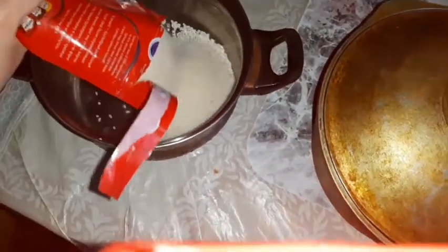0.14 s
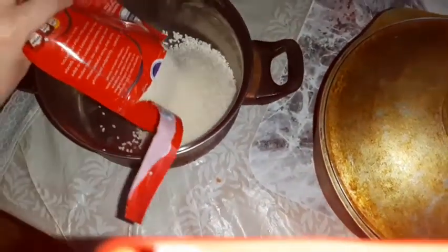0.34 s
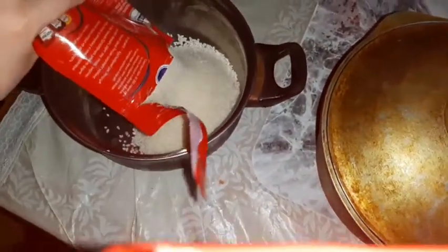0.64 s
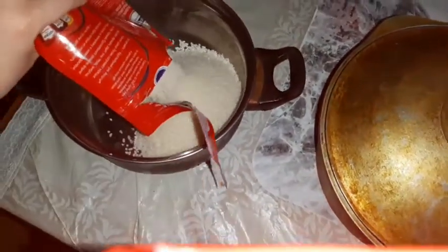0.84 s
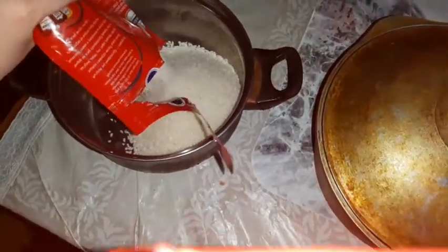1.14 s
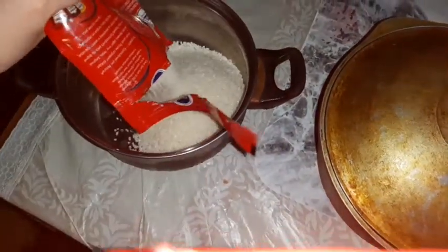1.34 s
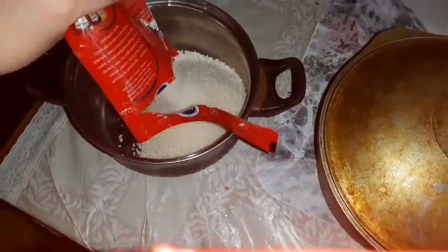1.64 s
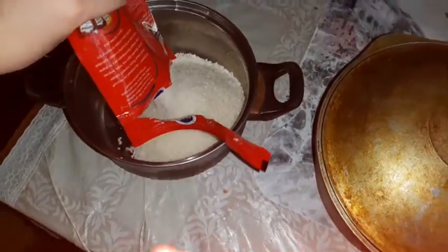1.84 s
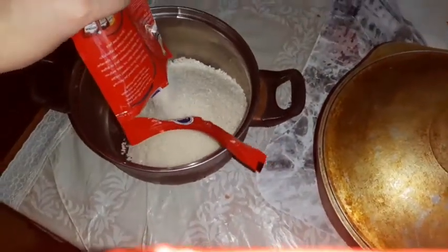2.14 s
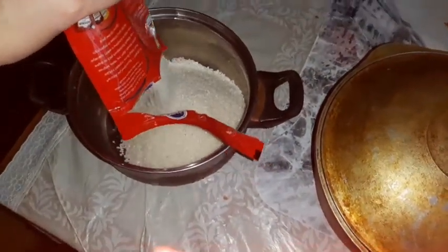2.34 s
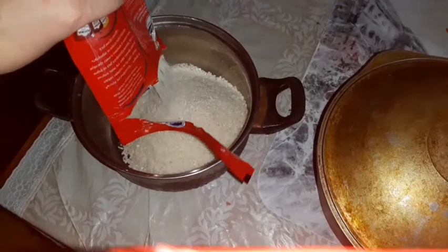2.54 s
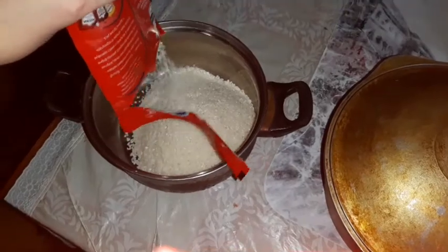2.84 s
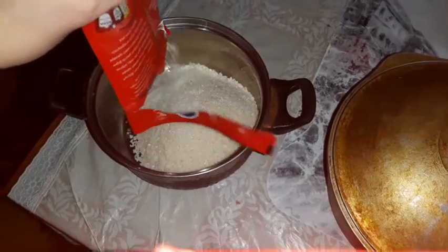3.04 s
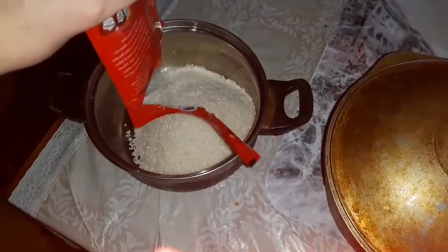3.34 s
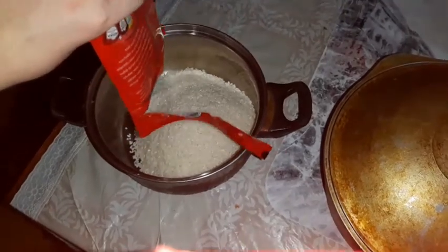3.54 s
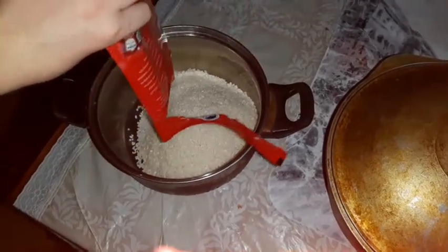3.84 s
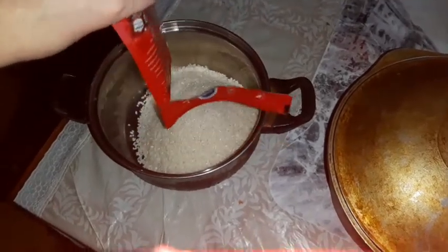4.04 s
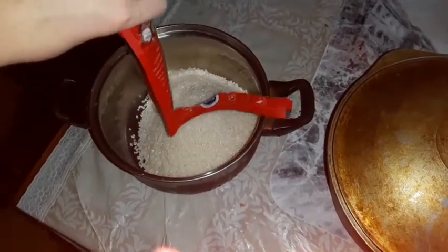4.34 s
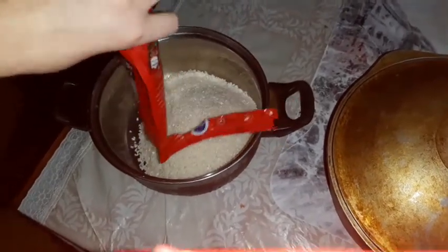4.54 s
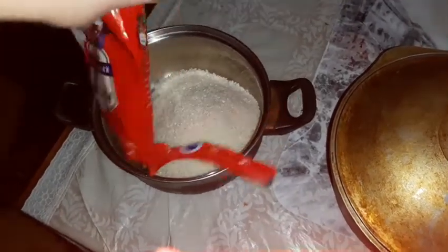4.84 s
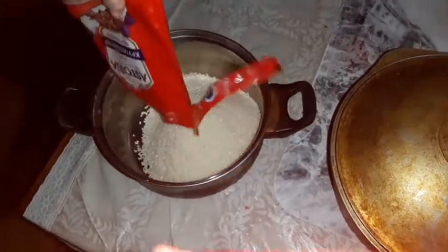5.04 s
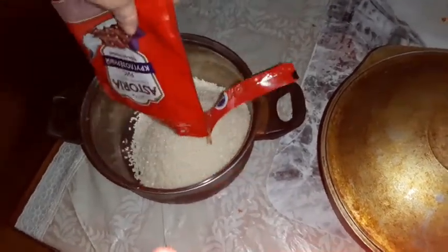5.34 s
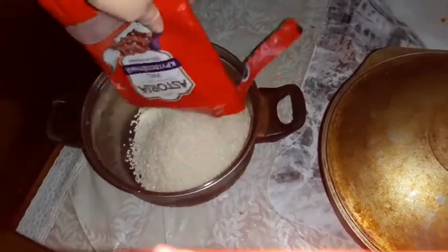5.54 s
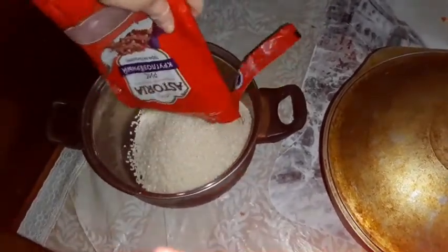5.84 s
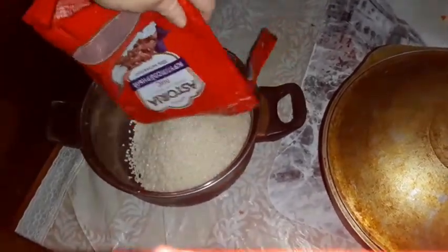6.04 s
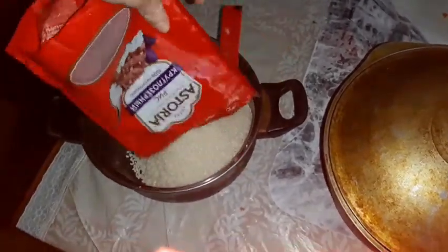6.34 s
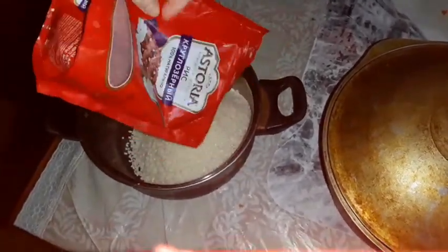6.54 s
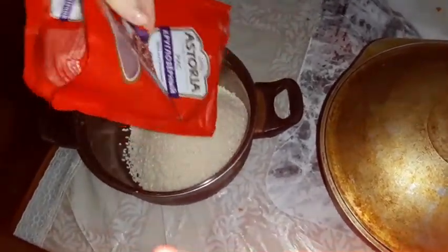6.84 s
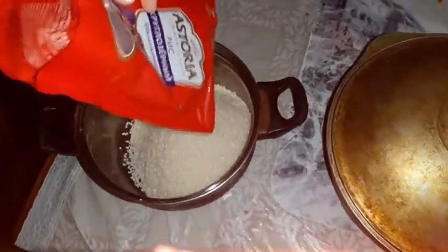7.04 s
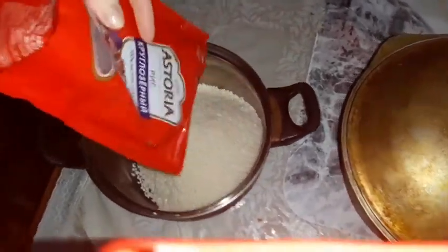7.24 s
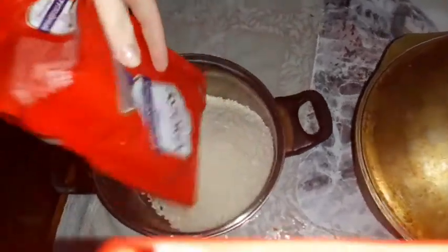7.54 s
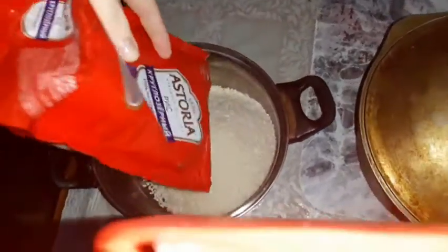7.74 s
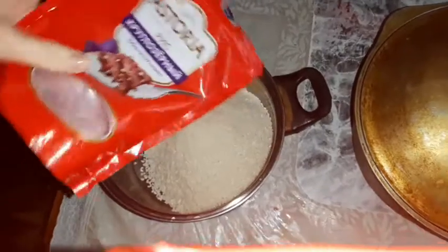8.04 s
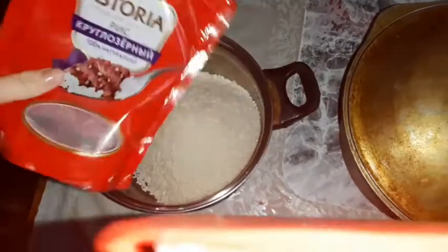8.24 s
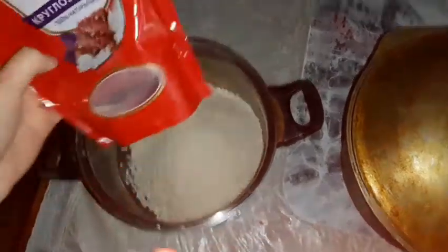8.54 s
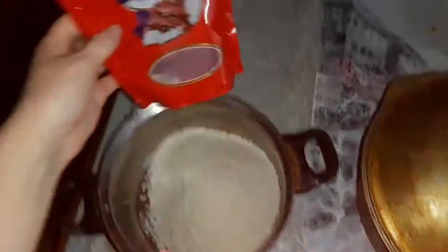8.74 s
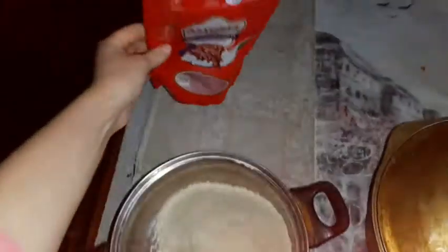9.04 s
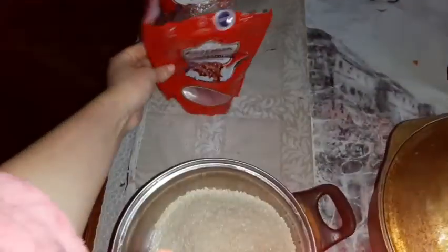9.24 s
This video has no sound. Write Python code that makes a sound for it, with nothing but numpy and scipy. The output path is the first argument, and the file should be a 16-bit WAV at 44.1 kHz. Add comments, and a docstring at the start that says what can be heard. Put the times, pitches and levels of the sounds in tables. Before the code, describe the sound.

A bright rush of dry grains rattles into a metal pot, close to a stereo microphone, with a few glassy plastic ticks. It dwindles to a trickle and ends. Plastic snaps, pops and dull bumps follow in bursts as the packet is emptied. A low refrigerator-like hum, leaning left, stops midway, and the last handling is very quiet in the short room.

```python
"""Dry rice pours from a plastic packet into a steel pot, close by in a small kitchen, over a motor's hum on the left.
Random impacts make the hiss of the heap; resonances make the ringing hollow and wall of the pot.
The packet is then shaken empty, snapping and crackling in shaped noise bursts, and carried off to the left.
The hum, harmonics over a noise rumble, is probably a refrigerator's and cuts out a little after five seconds."""
import sys
import numpy as np
from scipy import signal
from scipy.fft import rfft, irfft, next_fast_len
from scipy.io import wavfile
from scipy.ndimage import uniform_filter1d

SR = 44100
rng = np.random.default_rng(int(sys.argv[2]) if len(sys.argv) > 2 else 0)


def put_to_file(sound):
    """Save the sound as 16-bit audio at rate SR, in the file named by the first command-line argument."""
    columns = np.atleast_2d(sound).T  # one column per channel
    safe = np.clip(columns, -1, 1)
    whole_steps = np.round(safe * 32767)
    wavfile.write(sys.argv[1], SR, whole_steps.astype(np.int16))


N = 414534
TIME = np.arange(N) / SR   # s

# Stereo image at the microphones. Each row: frequency in Hz, left minus right in dB.
LEAN = [(60, 9.5), (110, 19), (200, 0.5), (400, 8), (1300, 3.5), (2400, 4), (4400, 1), (15000, 0.5)]
# Likeness of the two channels. Each row: frequency in Hz, correlation from 0 to 1.
LIKENESS = [(60, 0.9), (300, 1), (640, 0.67), (1400, 0.57), (3100, 0.32), (6800, 0.73), (15000, 0.62)]
# Decay of the small kitchen. Each row: frequency in Hz, time to fall 60 dB in s.
ROOM_T60 = [(150, 0.24), (530, 0.28), (1400, 0.23), (4000, 0.18), (12000, 0.15)]
CUTOFF_HZ = 15850   # nearly nothing is heard above this

# The stream swells, then runs out. Each row: time in s, hiss level in dB.
POUR = [(0, -32), (.2, -32.5), (.8, -31.5), (1.25, -33.5), (1.7, -30), (2.0, -31), (2.2, -34.5),
        (2.55, -36), (2.74, -46), (3.3, -44.5), (3.45, -52.5), (3.9, -91)]
# Grains landing on grains. Each row: frequency in Hz, relative density in dB per Hz.
GRAIN_COLOUR = [(40, -6.5), (200, -12), (400, 2), (700, 0.5), (2200, 2.5), (3400, 2.5), (5000, 2.5),
                (6600, 1.4), (7900, 4), (9200, -1), (11000, 0.5), (12200, 1.5), (13500, -2), (15700, -4)]
# Air in the pot's hollow. Each row: frequency in Hz, width in Hz, relative level in dB.
HOLLOW_MODES = [(583, 20, -9.5), (700, 40, -4.5), (812, 30, -1), (907, 38, -5.5), (1056, 36, 5.5),
                (1132, 55, 1), (1242, 45, -2.5), (1335, 58, .5), (1400, 24, -2), (1476, 23, -3.5),
                (1500, 13, -3)]
# The pot's steel wall. Each row: frequency in Hz, width in Hz, relative level in dB.
WALL_MODES = [(1643, 49, 0), (1806, 35, 1), (2233, 59, -7), (2370, 60, -5.5), (2665, 55, -1),
              (2730, 50, .5), (2835, 45, -0.5), (2926, 45, -0.5), (3330, 45, -4.5)]
# The pot's highest rings. Each row: frequency in Hz, width in Hz, relative level in dB.
RIM_MODES = [(6100, 75, 1), (8150, 76, -10), (10020, 40, -2), (12280, 60, -0.5)]
# Ring of the hollow, weaker late in the pour. Each row: time in s, level re the hiss in dB.
HOLLOW_RING = [(0, -7), (.4, -2), (.85, -4), (1.3, -3), (1.8, -8.5), (2.6, -6)]
# ring of the wall re the hiss at full flow, when the pot is empty and when all the rice is in
WALL_EMPTY_DB, WALL_FULL_DB = -18.5, -2
# dB re the hiss per dB of flow: a thin stream misses the wall, and single grains stand out
WALL_FOLLOWS, STRAYS_FOLLOW = 0.33, -0.26
PINGS_PER_S, PING_WIDTH_HZ, PING_DB = 45, 870, -9   # ticking single grains: rate at each of nine pitches
MODE_WANDER_DB, MODE_WANDER_PER_S = 0.04, 9   # the landing spot shifts: very slight change in each ring's drive
MODE_BEND_MS, MODE_BENDS_PER_S = 0.17, 7   # the shifting heap makes each ring run a little ahead or behind

HUM_HZ = 100.54   # the motor's fundamental
# Hum amplitudes just before the cut. The entries: first, second and third harmonic in dB.
HUM_DB = [-31, -51.5, -47.5]
THIRD_FLUTTER_DB, THIRD_FLUTTER_PER_S = 4, 16   # the third harmonic buzzes unevenly
# The motor's rumble. Each row: frequency in Hz, relative density in dB per Hz.
RUMBLE_COLOUR = [(30, -25.5), (55, -16.5), (84, -16), (110, 5), (140, -4), (162, 2), (190, -7.5),
                 (240, -11.5), (312, -2), (390, -14.5), (500, -19.5), (660, -21.5), (850, -16.5),
                 (1700, -22.5), (2200, -18.5), (2900, -32), (3900, -27), (9000, -45.5)]
RUMBLE_DB = -39   # just before the cut
MOTOR_OFF_S, MOTOR_RISE_DB_PER_S = 5.325, 0.51   # slightly louder and louder until it cuts out
RUN_DOWN_DB, RUN_DOWN_S = 15, 0.061   # lost this soon after the cut; slower from then on

# The still kitchen, with a faint high whine. Each row: frequency in Hz, relative density in dB per Hz.
FLOOR = [(30, -15), (100, 6), (330, 6.5), (600, -9), (1000, -11.5), (2700, -12.5), (3400, -16.5),
         (4500, -10.5), (8000, -7.5), (13450, -10), (13620, -1), (13800, -10.5), (16000, -14)]
FLOOR_DB = -68.6

# Packet and hand bump softly against pot and table.
# Each row: start in s, direct peak in dB, pitch in Hz, send to the room in dB.
BUMPS = [(.005, -19.5, 318, -24), (4.300, -25, 301, -14), (4.93, -26.5, 278, -13),
         (5.607, -28.5, 287, -0.5), (5.759, -30.5, 282, -8), (6.138, -38, 292, -12),
         (6.184, -31.5, 336.3, -8), (6.349, -38.5, 105, -5), (6.371, -51, 106, -14), (6.487, -40, 246, -2),
         (6.575, -42, 278, -2), (6.631, -49, 300, -1), (7.845, -54, 260, -5), (7.908, -47, 270, -4),
         (8.385, -48.5, 311, -0.5), (8.513, -41.5, 272, -4), (8.541, -44, 183, -6), (9.241, -43.5, 149, -9),
         (9.267, -48, 160, -12)]
# The packet's air. Each row: multiple of the pitch, width as a share of the pitch, relative level in dB.
BUMP_MODES = [(1, 0.27, 4.5), (1.45, .2, -5)]
# The table top. Each row: frequency in Hz, width in Hz, relative level in dB.
TABLE_MODES = [(100, 41, -7)]

# Tiny creases flick over, high and glassy. Each row: start in s, peak before the room in dB.
TICKS = [(.6784, -34), (1.5923, -28), (1.6393, -16), (1.72, -21), (1.7694, -12), (1.809, -14.5),
         (2.006, -13.5), (2.114, -20), (2.613, -23.5), (2.837, -28), (2.876, -27), (3.004, -30),
         (3.035, -27), (3.17, -25), (3.3035, -21), (3.383, -26), (4.259, -30), (4.281, -19.5),
         (4.38, -32.5), (5.213, -29), (5.225, -30), (5.237, -38), (7.473, -45.5)]
# Ring of such a crease. Each row: frequency in Hz, width in Hz, relative level in dB.
TICK_MODES = [(7780, 450, 1.5), (10460, 2300, -3), (13900, 3300, -7.5)]

# Tilts and shakes send grains and crinkles through the packet.
# Each row: time of the height in s, half length in s, level in dB.
SHAKES = [(3.13, 0.14, -47.5), (3.298, 0.033, -38), (3.58, 0.076, -45.5), (3.86, 0.16, -48),
          (4.055, 0.04, -29.5), (4.1, 0.051, -38), (4.215, 0.024, -44.5), (4.27, 0.16, -43.5),
          (4.7, 0.1, -56), (5.09, 0.15, -47.5), (5.312, 0.036, -41), (5.67, 0.17, -46.5),
          (5.843, 0.023, -34), (5.878, 0.05, -37.5), (6.05, 0.39, -58.5), (9.305, 0.052, -50.5)]
# Grains and crinkles in the packet. Each row: frequency in Hz, relative density in dB per Hz.
SLIDE_COLOUR = [(150, -29.5), (400, -2), (900, -3.5), (1300, 2), (1550, -3), (1700, -0.5), (2000, -4),
                (2750, -4), (3200, -2.5), (4500, -6), (8000, -10.5), (10000, -13.5), (13000, -13.5),
                (16000, -19)]
WRINKLES_PER_S, WRINKLES_DB = 260, -8.5   # sparse sharp wrinkles among the grains; level re the grains
# The empty packet bends in the hand. Each row: time of the height in s, half length in s, level in dB.
BENDS = [(5.44, 0.042, -55), (5.68, 0.22, -40), (6.24, 0.13, -50.5), (6.365, 0.037, -61),
         (6.61, 0.031, -50.5), (6.88, 0.037, -63), (7.25, 0.39, -67), (7.318, 0.0088, -61),
         (7.92, 0.055, -59), (8.3, 0.79, -72), (9.35, 0.076, -55)]
# The empty packet flexing. Each row: frequency in Hz, relative density in dB per Hz.
FLEX_COLOUR = [(30, -32), (70, -7.5), (120, -2), (200, -4.5), (300, 4), (420, 0.5), (600, -11.5),
               (1300, -13.5), (2400, -23.5), (4500, -30.5), (9000, -53)]
# Fingers stroke the foil, which sings a little at each spot.
# Each row: time of the height in s, half length in s, gain in dB, singing pitch in Hz.
STROKES = [(6.62, 0.036, -61, 6000), (6.723, 0.041, -64.5, 6200), (6.856, 0.048, -62.5, 5440),
           (7.035, 0.037, -60.5, 5180), (7.192, .025, -68, 4900), (7.414, 0.13, -70, 7050),
           (7.613, .022, -67, 5960), (7.827, .032, -61.5, 4970), (7.888, 0.024, -62, 7600),
           (8.09, .025, -67.5, 6500), (8.172, 0.032, -59.5, 5670), (8.229, 0.024, -62, 4500),
           (8.475, 0.035, -67, 7000), (8.55, 0.051, -57, 7300), (8.818, 0.12, -64.5, 6550),
           (9.323, .062, -58, 8000)]
# Fingers rubbing foil. Each row: frequency in Hz, relative density in dB per Hz.
RUB_COLOUR = [(400, 6), (1300, 3), (1900, -3), (3300, -1.5), (5000, 1.5), (8000, 1), (12000, -2.5),
              (16000, -2)]
STROKE_WIDTH_HZ, STROKE_SING_DB = 800, -5.5

# The packet knocks against the rim or a finger; the stiffer the spot, the higher the band that rings.
# Each row: start in s, relative level in dB, lower edge in Hz, upper edge in Hz, scuff re the contact in dB.
KNOCKS = [(3.0113, -31, 830, 1770, -9), (3.755, -42, 700, 1280, -23), (3.821, -38.5, 805, 1700, -10),
          (3.931, -38, 645, 1335, -9), (4.301, -39, 220, 700, -15), (4.911, -40.5, 900, 1560, -16),
          (4.919, -39, 750, 1800, -9), (4.930, -34, 434, 1040, -13), (5.009, -39, 2400, 3050, -15),
          (5.0235, -26, 650, 1490, -21), (5.0302, -30.5, 740, 1450, -15), (5.415, -43, 400, 1400, -6),
          (5.436, -46, 1400, 2280, -6), (5.478, -46, 700, 1600, -14), (5.5439, -39.5, 450, 1400, -20),
          (5.606, -28.5, 450, 1500, -10), (5.614, -34, 350, 1220, -13), (5.646, -43, 300, 900, -13),
          (5.715, -36, 400, 1400, -10), (5.761, -36.5, 302, 1300, -15), (5.8282, -28, 2500, 3100, -13),
          (5.962, -41.5, 600, 1680, -10), (6.1367, -31.5, 350, 1540, -29), (6.179, -49, 278, 790, -19),
          (6.275, -39, 547, 1820, -14), (6.442, -54.5, 506, 1600, -6), (6.488, -50, 298, 1070, 0),
          (6.63, -56, 300, 1260, -22), (7.315, -74, 400, 1400, -11), (7.412, -53.5, 600, 2200, -4),
          (7.419, -51.5, 250, 1190, -29), (8.509, -46, 700, 1510, -15), (8.523, -47.5, 293, 1000, -15),
          (8.7085, -46, 390, 1320, -7), (8.763, -49.5, 650, 2370, 1), (8.7635, -61, 4850, 5200, -14),
          (9.373, -50, 700, 1600, -1), (9.381, -48, 450, 1470, -10)]
# The filled pot and the table under it. Each row: frequency in Hz, width in Hz, relative level in dB.
KNOCK_BODY_MODES = [(415, 56, 4.5), (885, 120, -10), (1170, 70, 1)]
KNOCK_CONTACT_S, KNOCK_FADE_S = .0016, .02   # time to the height of the contact; fading time of the scuff
KNOCK_TOP_RATIO = 1.67   # a soft contact excites little above this multiple of the upper edge

# Dry clicks of single grains and small wrinkles. Each row: start in s, peak before the room in dB.
CLICKS = [(3.0133, -29), (3.554, -32), (4.977, -38), (5.008, -33), (5.0315, -28), (5.065, -30.5),
          (5.1455, -35), (5.1676, -33), (5.1945, -30), (5.248, -25), (5.2594, -38), (5.401, -35),
          (5.452, -40.5), (5.5583, -30), (5.697, -34), (5.7723, -34), (5.808, -24), (5.8304, -16),
          (5.887, -22), (6.0945, -29), (6.137, -16), (6.571, -51), (8.2178, -53), (8.7643, -57)]

# The packet buckles. Sharpness names the loudest part: 0 thud, 1 pop, 2 crack, 3 sizzle; it may lie beyond.
# Each row: start in s, relative strength in dB, sharpness, change of level one step away (positive is a fall)
# in dB, flutter re the snap in dB.
BUCKLES = [(3.117, -36, 2.5, 3, -6), (3.189, -39, 1.5, 9, -7), (3.214, -34, 3.5, 4.5, -11),
           (3.26, -34, 3.5, 2.5, -12), (3.479, -43, 2, 3, -3), (3.51, -40.5, 2.5, 10, -10),
           (3.527, -41, 1.5, 12, -8), (3.566, -38.5, 3, 9, -18), (3.584, -49, 7, 1, -6),
           (3.629, -40, 2, 5.5, -9), (3.993, -37.5, 1.5, 1.5, -9), (4.031, -32.5, 3.2, 8.5, -11),
           (4.046, -29, 1.5, 5.5, -4), (4.079, -27, 4.5, 2.5, -8), (4.187, -49, 4.5, 0.5, -10),
           (4.199, -35.5, 3, 4, -10), (4.212, -31, 3.5, 7, -4), (4.331, -31.5, 3.5, 5.5, -7),
           (5.007, -37.5, 1.5, 8, -11), (5.029, -38, 2.5, 9, -6.5), (5.077, -40, 2.5, 5, -8),
           (5.136, -35.5, 1.2, 6.5, -3), (5.192, -35, 1.4, 11, -8.5), (5.212, -31.5, 5.5, 1, -9),
           (5.223, -39.5, 7, 6.5, -8), (5.235, -39, 3.5, 0, -11), (5.286, -35.5, 2.5, 1.5, -2),
           (5.302, -43, 1, 4.5, -12), (5.334, -48, 1.5, -1, -10), (5.412, -48, 3.5, 5, -8),
           (5.517, -50.5, 2.3, 8, -11.5), (5.542, -37.5, 1, 6, -6.5), (5.582, -31.5, 1.1, 6, -9),
           (5.627, -33.5, 0.8, 9.5, -6), (5.709, -32, 1.1, 6, -3.5), (5.747, -42, 2.5, 3.5, -11),
           (5.806, -33, 2, 6.5, -8), (5.817, -33.5, 1, 3.5, -3), (5.8282, -30, 2.5, 3, -6),
           (5.839, -30.5, 2, 4.5, -9.5), (5.929, -35, 2.5, 2, -8), (6.076, -38.5, 1.5, 5.5, -10),
           (6.093, -27, 2, 6.5, -20), (6.135, -30.5, 4.5, .5, -11), (6.3287, -31, 1.73, 5.5, -5),
           (6.338, -36.5, 0.5, 8, 1), (6.356, -43, 1.6, 12, 1), (6.571, -54, 3, 13, -5),
           (7.469, -51.5, 0.8, 3.5, -12), (7.871, -66, 3.5, -0.5, 1), (7.903, -48, 4.5, 3, -13),
           (9.237, -60, 6, 0, -2), (9.243, -58, 7, 1.5, -5)]
# A broad panel of foil. Each row: frequency in Hz, width in Hz, relative level in dB.
PANEL_MODES = [(750, 180, 1.5), (1240, 170, 1.5), (1770, 240, -3)]
# A stiff crease. Each row: frequency in Hz, width in Hz, relative level in dB.
CREASE_MODES = [(2180, 770, -1), (2840, 310, 4), (3640, 1000, -1.5), (4700, 2000, -6.5)]
FLUTTER_T60_S = 0.08   # the foil settles after a snap
POT_ECHO_DB = -7.5   # cracks of the packet ring the wall of the pot beneath it

# The packet is carried off to the left. Each row: time in s, extra left minus right in dB.
PACKET_LEAN = [(0, -0.5), (5, 0), (5.7, 0), (6.2, -0.5), (6.6, 3), (8.5, 3.5), (9.4, 1.5)]


def from_db(db):
    """Decibels to gain."""
    return np.exp(np.asarray(db) * (np.log(10) / 20))


def rms_one(x):
    """Scale to unit power."""
    return x / np.sqrt(np.mean(x ** 2) + 1e-20)


def peak_at(sound, peak_db):
    """Scale a sound to a peak in dB."""
    return from_db(peak_db) * sound / np.abs(sound).max()


def at_hz(points, hz):
    """Read a table on a log-frequency axis."""
    f, value = np.transpose(points)
    return np.interp(np.log(np.maximum(hz, 1)), np.log(f), value)


def over_time(points):
    """Read a table at every sample."""
    return np.interp(TIME, *np.transpose(points))


def pan(left_db):
    """Left and right gains whose mean is one."""
    sides = from_db(np.array([[.5], [-.5]]) * left_db)
    return sides / sides.mean(0)


def drift(rate):
    """Smooth chance with about `rate` turns a second; spread 1."""
    knots = rng.standard_normal(8192)
    return rms_one(np.interp(TIME * rate, np.arange(len(knots)), knots))


def swells(rows):
    """Gain in time of smooth gestures, each rising to its height and falling again."""
    t = TIME[::32]
    gain = sum(from_db(db) * np.exp(-((t - s) / half) ** 2) for s, half, db in rows)
    return np.interp(TIME, t, gain)


def band(x, low_hz, high_hz):
    """Causal band-pass."""
    edges = [low_hz, min(high_hz, .45 * SR)]
    return signal.sosfilt(signal.butter(2, edges, "band", fs=SR, output="sos"), x + 1e-18)


def resonate(x, modes):
    """Parallel two-pole resonances of alternating sign; a wider one dies sooner."""
    out = 0
    for k, (hz, width, db) in enumerate(modes):
        r = np.exp(-np.pi * width / SR)
        poles = [1, -2 * r * np.cos(2 * np.pi * hz / SR), r * r]
        ring = signal.lfilter([1, 0, -1], poles, x + 1e-18)
        out = out + (-1) ** k * from_db(db) * (1 - r * r) / 2 * ring
    return out


def wandering(hits, modes):
    """Resonances each struck very slightly harder or softer over time, and wavering in pitch."""
    out = 0
    for mode in modes:
        ring = resonate(hits * from_db(MODE_WANDER_DB * drift(MODE_WANDER_PER_S)), [mode])
        bent = TIME + MODE_BEND_MS / 1000 * drift(MODE_BENDS_PER_S)
        out = out + np.array([np.interp(bent, TIME, side) for side in ring])
    return out


def impacts(per_s, size_db):
    """Two trains of random tiny collisions of uneven strength, at a steady mean power."""
    chance = np.clip(per_s / SR, 1e-4, 1)
    hit = rng.random((2, N)) < chance
    sizes = rng.laplace(0, 1, (2, N))[hit]
    train = np.zeros((2, N))
    train[hit] = np.sign(sizes) * from_db(size_db * np.minimum(np.abs(sizes), 5))
    return train / np.sqrt(chance)


def spread(pair, colour):
    """Two unrelated signals become one coloured sound, left of the microphones and partly diffuse; mid rms 1."""
    size = next_fast_len(N)
    hz = np.arange(size // 2 + 1) * SR / size
    mid, side = rfft(pair, size) * from_db(at_hz(colour, hz)) * np.minimum(hz / 20, 1)
    alike = np.clip(at_hz(LIKENESS, hz), 0, 1)
    sides = np.sqrt(1 + alike) * mid + np.sqrt(1 - alike) * side * [[1], [-1]]
    out = irfft(sides * pan(at_hz(LEAN, hz)), size)[:, :N]
    return out / out.mean(0).std()


def add(track, s, sound):
    """Mix a short sound in at time s."""
    start = max(round(s * SR), 0)
    track[start:start + len(sound)] += sound[:max(N - start, 0)]


def kitchen(x, wet_db):
    """The direct sound plus a diffuse tail whose decay and left-right likeness depend on frequency."""
    t = TIME[:SR // 2]
    edges = np.geomspace(60, 16000, 9)
    tail = 0
    for low, high in zip(edges, edges[1:]):
        hz = np.sqrt(low * high)
        alike = np.clip(at_hz(LIKENESS, hz), 0, 1) ** 2
        separate, common = rng.standard_normal((2, len(t))), rng.standard_normal(len(t))
        noise = np.sqrt(1 - alike) * separate + np.sqrt(alike) * common
        tail = tail + band(noise, low, high) * from_db(-60 * t / at_hz(ROOM_T60, hz))
    tail = tail * np.clip(t / 0.0073, 0, 1)   # the tail builds up over 7.3 ms
    tail = tail / np.sqrt(np.sum(tail ** 2) / 2)
    return x + from_db(wet_db) * signal.oaconvolve(x[None], tail, axes=1)[:, :N]


def rice():
    """Grains land in clumps and ring the pot; as it fills, the wall takes over from the hollow."""
    hiss = from_db(over_time(POUR))
    flow, fill = hiss / hiss.max(), np.cumsum(hiss) / hiss.sum()
    hollow_gain = from_db(over_time(HOLLOW_RING))
    wall_gain = from_db(WALL_EMPTY_DB + (WALL_FULL_DB - WALL_EMPTY_DB) * fill) * flow ** WALL_FOLLOWS

    clumps = from_db(0.49 * drift(300) + 0.98 * drift(25))
    grains = impacts(per_s=14000 * np.sqrt(flow), size_db=0.6) * clumps
    rim = from_db(-3.0) * resonate(grains[::-1], RIM_MODES)   # swapped trains make it more diffuse
    # a few grains bounce hard
    stray_gain = from_db(-12.0) * np.maximum(flow, .15) ** STRAYS_FOLLOW
    strays = stray_gain * impacts(per_s=300 * np.sqrt(flow), size_db=0.9)
    pings = sum(resonate(impacts(per_s=PINGS_PER_S, size_db=1.0), [(hz, PING_WIDTH_HZ, PING_DB)])
                for hz in np.geomspace(2200, 13000, 9))
    heap = spread(grains + rim + strays + pings, GRAIN_COLOUR)

    hard_hits = impacts(per_s=5000, size_db=0.5)
    # colours in Hz and relative dB
    hollow = spread(wandering(hard_hits, HOLLOW_MODES), [(300, -0.5), (800, -0.5), (1600, 0.0), (4000, -9.5)])
    wall = spread(wandering(hard_hits, WALL_MODES), [(700, -9.5), (1600, -1.5), (3000, -3.0), (6000, -3)])
    return hiss * (heap + hollow_gain * hollow + wall_gain * wall)


def motor():
    """A hum at twice the mains rate over the rumble of the shaking cabinet; both die when it cuts out."""
    before, after = np.maximum(MOTOR_OFF_S - TIME, 0), np.maximum(TIME - MOTOR_OFF_S, 0)
    running = from_db(-MOTOR_RISE_DB_PER_S * before - RUN_DOWN_DB * (after / RUN_DOWN_S) ** 0.42)
    phase = 2 * np.pi * HUM_HZ * TIME + 0.11 * drift(6)
    flutter_db = THIRD_FLUTTER_DB * drift(THIRD_FLUTTER_PER_S)
    hum = sum(from_db(db + flutter_db * (k == 3)) * np.sin(k * phase) for k, db in enumerate(HUM_DB, 1))
    uneven_hum = hum * from_db(0.93 * drift(9.9))
    rumble = from_db(RUMBLE_DB) * spread(rng.standard_normal((2, N)), RUMBLE_COLOUR)
    return running * (uneven_hum * pan(11.5) + rumble)


def still_kitchen():
    """Steady coloured noise: the quiet room and its faint whine."""
    return from_db(FLOOR_DB) * spread(rng.standard_normal((2, N)), FLOOR) * pan(3.0)


def bumps():
    """A soft push sets the table top and the packet's air ringing low."""
    push = np.exp(-TIME[:SR // 5] / 0.00066)
    table = resonate(push, TABLE_MODES)
    direct, sent = np.zeros((2, N))
    for s, peak_db, pitch_hz, room_db in BUMPS:
        air = resonate(push, np.array(BUMP_MODES) * [pitch_hz, pitch_hz, 1])
        sound = peak_at(air + table, peak_db)
        add(direct, s, sound)
        add(sent, s, from_db(room_db) * sound)
    tail = kitchen(sent, wet_db=-1) - sent
    return (direct + tail) * pan(8.5)


def ticks():
    """Creases flick over: a short noise burst rings them briefly, very high."""
    t = TIME[:SR // 20]
    track = np.zeros(N)
    for s, peak_db in TICKS:
        flick = rng.standard_normal(len(t)) * np.exp(-t / 0.0034)
        add(track, s, peak_at(resonate(flick, TICK_MODES), peak_db))
    return kitchen(track, wet_db=-2.5) * pan(1.6)


def foil():
    """Tiny impacts make the crackle of sliding grains, dull flexing of the packet and whisper of fingers."""
    crackle = impacts(per_s=3200, size_db=0.5) * from_db(2.4 * drift(220))
    wrinkles = from_db(WRINKLES_DB) * impacts(per_s=WRINKLES_PER_S, size_db=0.5)
    sliding = swells(SHAKES) * spread(crackle + wrinkles, SLIDE_COLOUR)

    flexing = impacts(per_s=1500, size_db=0.5) * from_db(2 * drift(45))
    bending = swells(BENDS) * spread(flexing, FLEX_COLOUR)

    rubbing = spread(impacts(per_s=9000, size_db=0.5) * from_db(2 * drift(70)), RUB_COLOUR)
    strokes = 0
    for s, half, db, hz in STROKES:
        singing = resonate(rubbing, [(hz, STROKE_WIDTH_HZ, STROKE_SING_DB)])
        strokes = strokes + swells([(s, half, db)]) * (from_db(-1.0) * rubbing + singing)
    return sliding + bending + strokes


def knocks():
    """A soft contact and a grainy scuff ring a band of the packet, over a weaker, broader body."""
    t = TIME[:SR // 10]
    contact = t / KNOCK_CONTACT_S * np.exp(1 - t / KNOCK_CONTACT_S)
    track = np.zeros(N)
    for s, db, low_hz, high_hz, scuff_db in KNOCKS:
        push, grain, uneven = rng.standard_normal((3, len(t)))
        uneven_db = 3.1 * rms_one(uniform_filter1d(uneven, size=70))
        scuff = from_db(scuff_db + uneven_db) * np.exp(-t / KNOCK_FADE_S)
        top_hz = KNOCK_TOP_RATIO * high_hz
        body = band(grain * contact + push * scuff, low_hz / 3, top_hz)
        sound = band(push * contact + grain * scuff, low_hz, high_hz) + from_db(-15.0) * body
        sound = signal.sosfilt(signal.butter(6, min(top_hz, CUTOFF_HZ), fs=SR, output="sos"), sound)
        add(track, s, from_db(db) * sound / sound[t < .009].std())   # levelled on its first 9 ms
    rung = from_db(-1.0) * track + from_db(-2.0) * resonate(track, KNOCK_BODY_MODES)
    return kitchen(rung, wet_db=-7.5) * pan(6.0)


def clicks():
    """A lone grain or wrinkle flicks the foil: a very short, broad click."""
    t = TIME[:SR // 100]
    track = np.zeros(N)
    for s, peak_db in CLICKS:
        flick = rng.standard_normal(len(t)) * np.exp(-t / 0.001)
        add(track, s, peak_at(band(flick, 2200, 9200), peak_db))
    return kitchen(track, wet_db=-4.0) * pan(2.3)


def buckles():
    """Foil snaps through in a few milliseconds and flutters on; the bag's air thuds, panels pop, creases crack."""
    t = TIME[:SR // 5]
    times, strength_db, sharpness, fall_db, flutter_db = np.transpose(BUCKLES)
    noise = rng.standard_normal((len(times), 5, len(t))).swapaxes(0, 1)
    snap = np.clip(t / .0012, 0, 1) * np.exp(-(t / .0036) ** 4)
    uneven = from_db(6.4 * rms_one(uniform_filter1d(noise[-1], size=50)))
    settling = from_db(-60 * t / FLUTTER_T60_S) * np.clip(t / 0.0028, 0, 1)
    flutter = from_db(flutter_db[:, None]) * uneven * settling
    low, middle, high, top = noise[:-1] * (snap + flutter)

    thud = band(low, 230, 640) + from_db(-5.0) * band(top, 110, 180)
    pop = band(resonate(middle, PANEL_MODES), 730, 2900)
    crack = band(resonate(high, CREASE_MODES), 1900, 6300)
    sizzle = band(top, 5000, 8370) + from_db(-6.5) * band(middle, 9100, 12500)

    tracks = np.zeros((4, N))
    for step, sounds in enumerate((thud, pop, crack, sizzle)):
        levels_db = strength_db - fall_db * np.abs(step - sharpness) ** 1.7
        for s, sound, db in zip(times, sounds, levels_db):
            add(tracks[step], s, rms_one(sound) * from_db(db))
    thuds, pops, cracks, sizzles = tracks
    cracks = cracks + from_db(POT_ECHO_DB) * resonate(cracks, WALL_MODES)
    dull = kitchen(from_db(-10.0) * thuds + from_db(-13.5) * pops, wet_db=-8.0)
    bright = kitchen(from_db(-14.5) * cracks + from_db(-17.0) * sizzles, wet_db=-5.0)
    return dull * pan(7.0) + bright * pan(4.4)


def scene():
    """Rice, packet and motor over the still kitchen."""
    packet = bumps() + ticks() + foil() + knocks() + clicks() + buckles()
    packet = packet * pan(over_time(PACKET_LEAN))
    return rice() + motor() + still_kitchen() + packet


def record(dry):
    """A steep low-pass filter cuts the top."""
    return signal.sosfilt(signal.ellip(12, .1, 80, CUTOFF_HZ, fs=SR, output="sos"), dry)


dry = scene()
out = record(dry)
put_to_file(out)
```